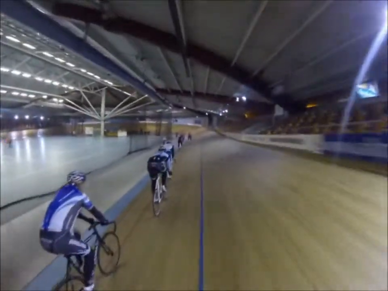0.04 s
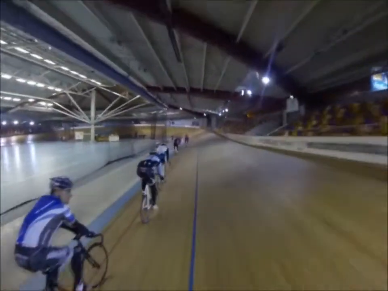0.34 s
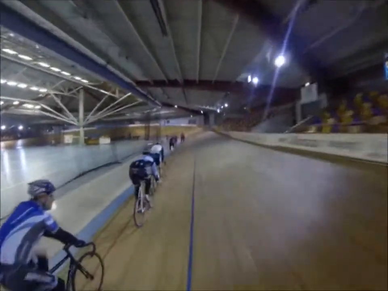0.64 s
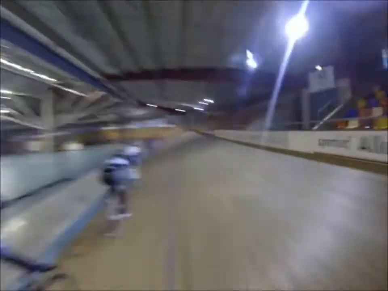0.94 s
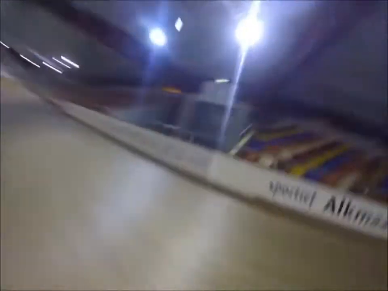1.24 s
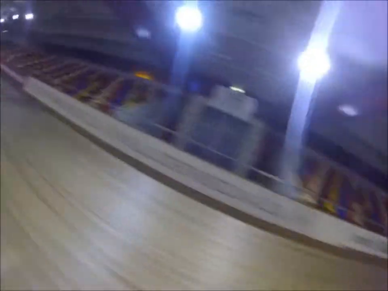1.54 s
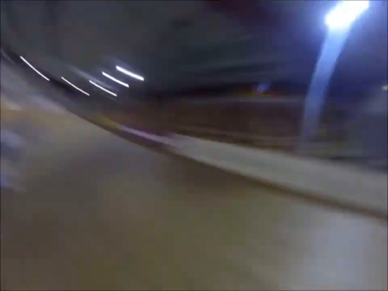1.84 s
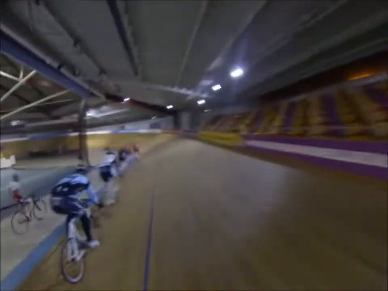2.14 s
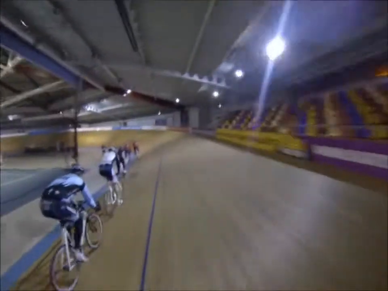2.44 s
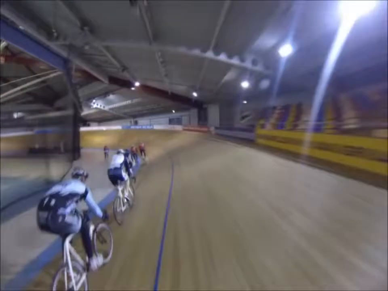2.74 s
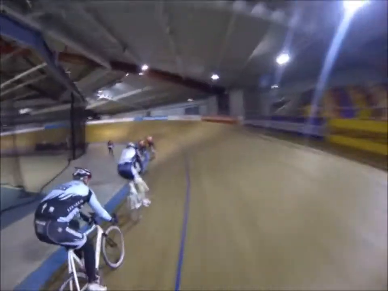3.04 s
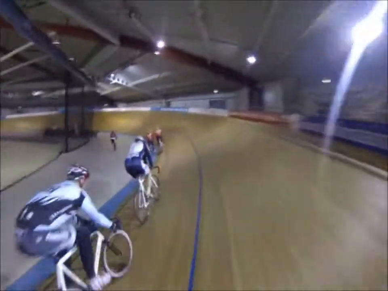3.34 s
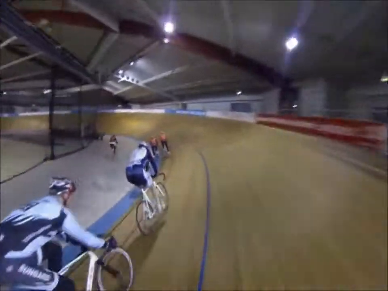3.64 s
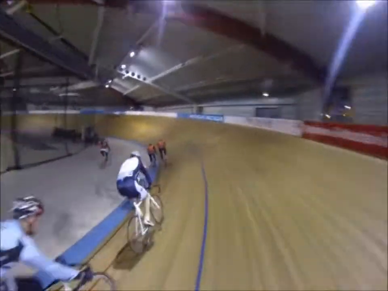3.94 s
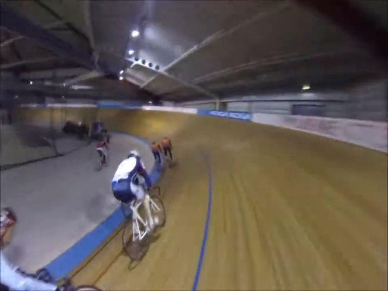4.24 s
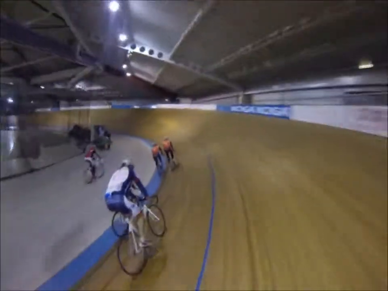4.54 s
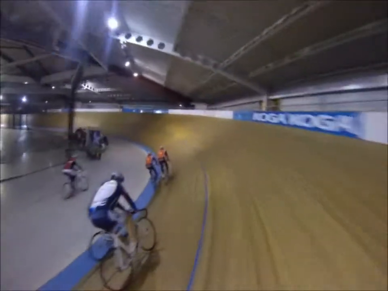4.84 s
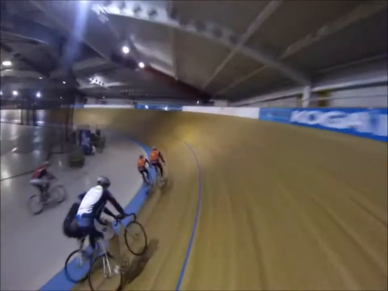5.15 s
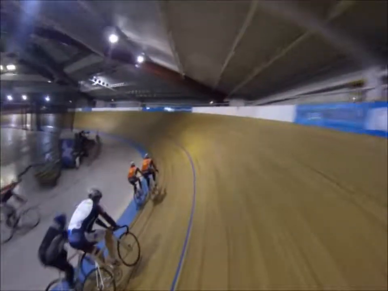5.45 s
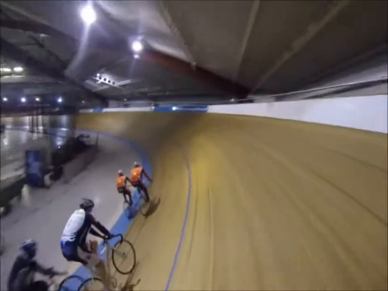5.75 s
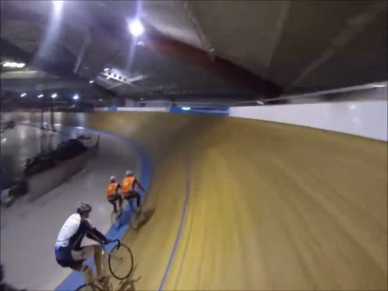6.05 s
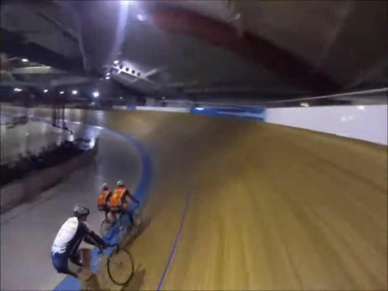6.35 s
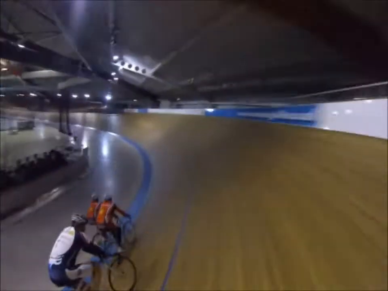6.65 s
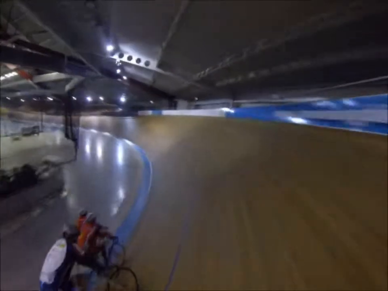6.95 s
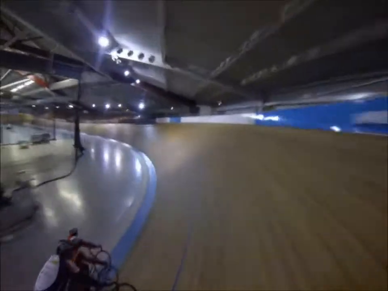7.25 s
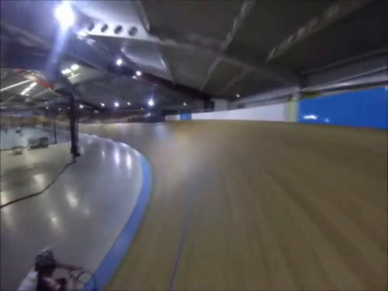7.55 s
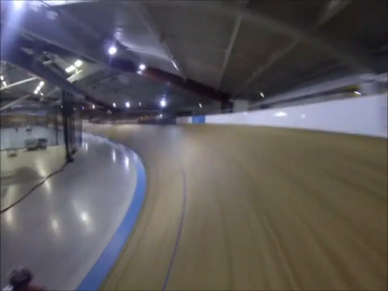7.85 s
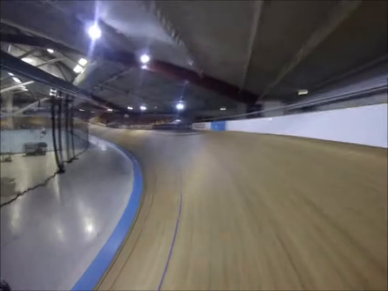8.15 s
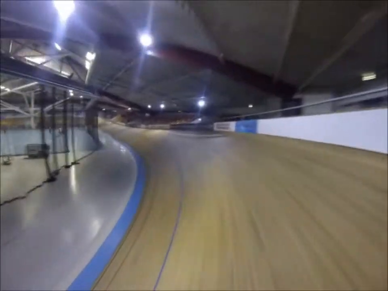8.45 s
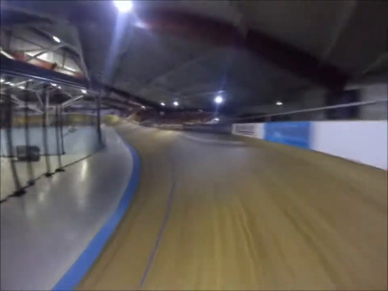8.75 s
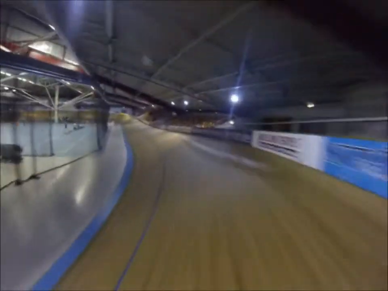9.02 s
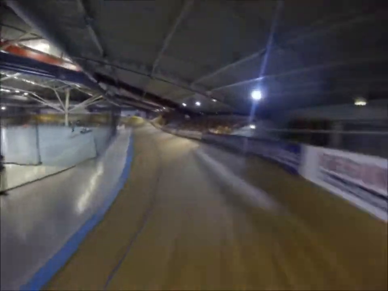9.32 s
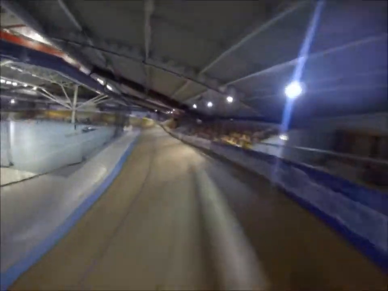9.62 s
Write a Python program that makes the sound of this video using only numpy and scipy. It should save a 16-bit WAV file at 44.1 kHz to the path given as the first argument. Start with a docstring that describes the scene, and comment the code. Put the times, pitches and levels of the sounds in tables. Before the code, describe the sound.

Bicycle tyres roar and lightly hiss on the boards of an indoor track, under the low rumble of wind hitting a microphone that rides along. Early on the air swells into a brief fluttering rush, then settles back to irregular thumps and short gusts with faint crackles. The bicycle chirps thinly for an instant, and later makes a single close, sharp tick and slight rattle as the rolling continues.

```python
"""Cycling round a wooden indoor track

Heard from a camera riding on the bicycle. Tyres roar on the boards below and the head wind rumbles on the
microphone, which crackles faintly on wind peaks; every strong eddy makes the gain control duck the whole
sound. When the rider turns to look sideways the air rushes straight over the port. Close by, the bicycle
gives one sharp tick with a small rattle, and a few thin chirps."""
import sys
import numpy as np
from scipy import signal
from scipy.fft import rfft, irfft, next_fast_len
from scipy.io import wavfile
from scipy.ndimage import map_coordinates

SR = 44100
rng = np.random.default_rng(int(sys.argv[2]) if len(sys.argv) > 2 else 0)


def materialize(psi):
    """Save the field psi as 16-bit PCM at rate SR to the path in sys.argv[1].

    A 1-D psi becomes a single channel; in a 2-D psi each row is a channel.
    """
    bounded = np.clip(np.atleast_2d(psi).T, -1, 1)
    quanta = np.round(bounded * 32767).astype(np.int16)
    wavfile.write(sys.argv[1], SR, quanta)


N = 431298
TIME = np.arange(N) / SR


def amp(db):
    """Decibels to gain."""
    return 10 ** (np.asarray(db) / 20)


def unit(x):
    """Scale to rms 1."""
    return x / np.sqrt(np.mean(x ** 2) + 1e-20)


def curves(rows):
    """One value per sample for each column after the time."""
    times, *columns = np.transpose(rows)
    return [np.interp(TIME, times, column) for column in columns]


def wobble(rate):
    """A smooth random curve, rate knots a second."""
    knots = rng.standard_normal(int(N * rate / SR) + 4)
    return map_coordinates(knots, [TIME * rate], mode="nearest")


def swell(s, width_s):
    """A bell-shaped rise and fall around time s."""
    bell = np.zeros(N)
    near = slice(*np.searchsorted(TIME, [s - 10 * width_s, s + 10 * width_s]))
    bell[near] = np.exp(-.5 * ((TIME[near] - s) / width_s) ** 2)
    return bell


def lagged(x, seconds):
    """One-pole smoothing."""
    keep = np.exp(-1 / (seconds * SR))
    return signal.lfilter([1 - keep], [1, -keep], x)


def filtered(x, response):
    """Filter x by a gain given as a function of frequency."""
    size = next_fast_len(N + SR // 2)
    return irfft(rfft(x, size) * response(np.fft.rfftfreq(size, 1 / SR)), size)[:N]


def noise(spectrum, resonances=()):
    """Noise of rms 1 with a smooth spectrum and resonant humps on it."""
    knots_hz, knots_db = np.transpose(spectrum)

    def response(hz):
        slope_db = np.interp(np.log(hz + 1), np.log(knots_hz), knots_db)
        humps_db = sum(db * np.exp(-.5 * ((hz - centre) / width) ** 2) for centre, width, db in resonances)
        return amp(slope_db + humps_db)
    return unit(filtered(rng.standard_normal(N), response))


def tilted(x, tilt_db, pivot_hz=300):
    """Tip the spectrum of x between 150 and 2500 Hz by tilt_db per octave, one value per sample."""
    hz, times, frames = signal.stft(x, SR, nperseg=512)
    octaves = np.log2(np.clip(hz, 150, 2500) / pivot_hz)
    gain = amp(octaves[:, None] * np.interp(times, TIME, tilt_db))
    return signal.istft(frames * gain, SR, nperseg=512)[1][:N]


# Tyres on the boards below the camera, roar and hiss: (frequency [Hz], spectral level [dB])
ROAR = [(80, -14.5), (200, 6), (400, 1), (620, -1.5), (880, -3.5), (1330, -13.5), (2050, -13.5),
        (2700, -21.5), (3400, -27), (4300, -35), (7000, -74)]
HISS = [(1500, -8.5), (3200, 6), (4400, 0), (5500, -8), (6400, -9), (7200, -17), (9700, -15.5),
        (11000, -16), (12200, -23.5), (14000, -29), (15200, -37)]
# Two hollow notes of the wheels on the boards: (frequency [Hz], spectral level [dB])
HIGH_HOLLOW = [(900, -120), (1450, -33), (1660, -7), (1750, 0.5), (1850, -1.5), (1990, -6.5), (2300, -34),
               (3500, -120)]
LOW_HOLLOW = [(850, -120), (1000, -20.5), (1085, 0), (1135, -2.5), (1220, -15.5), (1450, -120)]
# Resonances of the housing round the microphone: (frequency [Hz], width [Hz], gain [dB])
HOUSING = [(1012, 20, -1), (1096, 60, 0.5), (1275, 87, -1), (1630, 113, 3), (2680, 130, -1),
           (2950, 92, 2.5), (4300, 280, -6), (5060, 330, 6), (8590, 440, 8.5)]
# Rolling noise of the tyres, swelling and easing along the track: (time [s], level [dB])
ROLLING_LEVEL = [(0, -26), (.25, -25), (.36, -26.5), (.53, -27.5), (.63, -27), (.78, -27), (.95, -27.5),
                 (1.85, -27.5), (2.3, -28), (2.6, -27), (2.9, -26.5), (3.08, -26), (3.21, -24),
                 (3.3, -27.5), (3.5, -29.5), (3.63, -27), (3.74, -28.5), (3.97, -25.5), (4.15, -29),
                 (4.4, -30), (4.62, -24), (4.8, -28.5), (5.05, -28.5), (5.22, -25), (5.35, -30.5),
                 (5.66, -26.5), (5.95, -29.5), (6.42, -26.5), (6.7, -27), (6.87, -24.5), (7.0, -25),
                 (7.17, -26), (7.6, -28.5), (7.95, -28), (8.1, -26), (8.25, -28), (8.5, -26.5),
                 (9.03, -28.5), (9.13, -26.5), (9.25, -28.5), (9.42, -29), (9.77, -26.5)]
# The hiss against the roar: (time [s], level [dB])
HISS_LEVEL = [(0, -24), (.8, -25.5), (1.3, -26), (2.0, -26), (2.7, -26), (3.15, -23.5), (3.45, -26.5),
              (4.6, -27.5), (5.5, -25), (6.1, -25.5), (6.9, -25.5), (7.9, -24.5), (8.7, -25.5),
              (9.77, -24.5)]
# The hollow notes against the roar: (time [s], high note level [dB], low note level [dB])
HOLLOW_LEVEL = [(0, -15.3, -18), (1.9, -18, -21.5), (2.8, -18.5, -28), (3.2, -15, -18), (4.2, -18.5, -18),
                (4.65, -16.5, -14), (5.3, -15.5, -15.5), (6.1, -15.5, -22), (7.0, -16.5, -15.5),
                (8.6, -17.5, -17.5), (9.77, -17, -18)]


def tyres(boards_db=0.65, grain_db=0.74, trim_db=0.23, sing_db=2.0):
    """Roar and hiss come through the housing, two notes come and go, and uneven boards shake them all."""
    level_db, = curves(ROLLING_LEVEL)
    hiss_db, = curves(HISS_LEVEL)
    high_db, low_db = curves(HOLLOW_LEVEL)
    shake_db = boards_db * wobble(35) + grain_db * wobble(220)
    rolling = noise(ROAR, HOUSING) + amp(hiss_db) * noise(HISS, HOUSING)
    high_note = amp(high_db + sing_db * wobble(14)) * noise(HIGH_HOLLOW)
    low_note = amp(low_db + sing_db * wobble(14)) * noise(LOW_HOLLOW)
    return amp(level_db + trim_db + shake_db) * (rolling + high_note + low_note)


# Thin chirps of the drive train, close but faint: (time [s], pitch [Hz], level [dB], width [s])
CHIRPS = [(0.61, 11970, -68, .012), (.645, 11850, -71, .012), (.752, 12000, -66, .012),
          (2.9515, 8450, -45, 0.0011), (2.964, 8800, -47, .0012), (2.978, 8800, -37, 0.0006),
          (2.986, 8350, -52, .003)]
# Light rubbing during and after the last chirps: (time [s], level [dB])
RUB_LEVEL = [(2.9, -100), (2.96, -63), (3.08, -62), (3.22, -73), (3.3, -100)]
# Its metallic colour: (frequency [Hz], spectral level [dB])
RUB_COLOUR = [(3000, -31), (5000, 3.5), (7300, -11), (8600, 6), (9600, -4), (12000, -11.5), (15000, -20)]


def chirps(waver_rad=1.3):
    """Metal rubs on metal: brief, unsteady high notes and a fine hiss."""
    drift = waver_rad * wobble(550)
    notes = sum(amp(db) * swell(s, width_s) * np.sin(2 * np.pi * hz * TIME + drift)
                for s, hz, db, width_s in CHIRPS)
    rub_db, = curves(RUB_LEVEL)
    return notes + amp(rub_db) * noise(RUB_COLOUR)


# One sharp, close bicycle tick with a small rattle, plus faint dry crackles of the microphone on
# wind peaks: (time [s], level [dB], pitch factor [ratio])
CLICKS = [(.903, -39, 2.9), (0.981, -30, 3.1), (1.3428, -22, 1.8), (3.641, -23.5, 2.4), (5.8286, -8, 1.01),
          (5.901, -26, 0.74), (5.9115, -27, 1.4), (9.445, -32, 2.7), (9.532, -28, 2.4), (9.568, -34, 1.16)]
# Modes of a click at pitch factor 1: (frequency [Hz], level [dB], time to fall 60 dB [s])
CLICK_MODES = [(814, -1, 0.011), (1560, -2.5, 0.011), (1790, 5, 0.0093), (2330, -6, 0.018),
               (3320, -12, 0.008), (5350, -20.5, 0.008)]


def tick_and_crackles(attack_s=0.00043):
    """Each click rings a few strongly damped modes; the higher its pitch, the sooner it dies."""
    out = np.zeros(N)
    t = np.arange(SR // 20) / SR
    onset = (1 - np.exp(-t / attack_s)) ** 2
    for s, level_db, pitch in CLICKS:
        ring = sum(amp(db - 60 * pitch * t / t60) * np.sin(2 * np.pi * hz * pitch * t)
                   for hz, db, t60 in CLICK_MODES)
        out[round(s * SR):][:len(t)] += amp(level_db) * ring * onset
    return out


# Head wind right on the microphone, strongest as the rider looks sideways: (time [s], level [dB])
WIND_LEVEL = [(0, -12), (.7, -13.5), (1.0, -6.5), (1.3, -3), (1.7, -9.5), (1.9, -13.5), (2.6, -12),
              (4.2, -14), (5.4, -13.5), (7, -13), (8.5, -13), (9.77, -13)]
# Its rumble: (frequency [Hz], spectral level [dB])
RUMBLE = [(8, 2.5), (20, -4.5), (33, 3), (60, -1.5), (110, -7), (200, -13.5), (320, -21.5), (600, -35.5),
          (1500, -66), (5000, -91)]


def head_wind(crest=3, cutoff_hz=1200, trim_db=-3.5):
    """Steady turbulence on the microphone; its swings are bounded."""
    level_db, = curves(WIND_LEVEL)
    bounded = np.tanh(noise(RUMBLE) / crest)
    swirl = filtered(bounded, lambda hz: 1 / (1 + (hz / cutoff_hz) ** 4))
    return amp(level_db + trim_db) * unit(swirl)


# Brief, weaker gusts brushing the microphone: (time [s], level [dB], width [s])
GUSTS = [(0.155, -18, 0.041), (0.363, -16, 0.052), (0.534, -21, 0.0155), (0.643, -17, 0.034),
         (0.772, -17, 0.035), (1.862, -23.5, 0.044), (2.135, -21.5, 0.077), (3.07, -20.5, 0.059),
         (3.203, -21, 0.037), (3.41, -22.5, 0.047), (3.627, -21.5, .026), (4.317, -19.5, 0.047),
         (4.663, -15, 0.047), (5.2, -25, 0.041), (5.696, -18, 0.019), (6.32, -24.5, 0.034),
         (6.825, -21.5, 0.06), (7.506, -21.5, 0.042), (7.876, -18, 0.0083), (8.06, -26, 0.053),
         (8.49, -23, 0.049), (8.785, -20, 0.019), (9.132, -27.5, 0.03), (9.43, -21.5, 0.035)]
# Their colour: (frequency [Hz], spectral level [dB])
GUST_COLOUR = [(40, -18.5), (100, 8.5), (170, 7), (300, -1), (550, -14.5), (900, -12.5), (1300, -23),
               (1800, -20), (2700, -31), (5000, -47), (12000, -77)]


def gusts(crest=8.5):
    """Short gusts swell and fade with a hollow, low roar."""
    flow = sum(amp(db) * swell(s, width_s) for s, db, width_s in GUSTS)
    return flow * unit(np.tanh(noise(GUST_COLOUR) / crest))


# Air across the microphone port as the rider looks sideways, brighter the more squarely it crosses:
# (time [s], level [dB], tilt [dB per octave])
CROSSWIND = [(0.8, -100, -4), (0.88, -19, -7), (0.925, -22, -8), (0.99, -8, -3.5), (1.06, -12.5, -1),
             (1.15, -12, 0.3), (1.25, -10, 0.4), (1.42, -10.5, 0), (1.5, -14.5, -0.5), (1.595, -14.5, 1.5),
             (1.625, -11.5, -4), (1.67, -15, -0.5), (1.74, -31, -4), (1.85, -100, -2)]
# Rush and fizz of that air at the port: (frequency [Hz], spectral level [dB])
RUSH = [(60, -13), (130, 5.5), (260, 7), (400, 1), (550, 2), (850, -2), (1250, -12), (1830, -12),
        (2500, -26.5), (4000, -41), (8000, -84), (14000, -86)]
FIZZ = [(2000, -2), (3200, 4), (4400, 1), (5200, -3), (7300, -12), (8600, 3), (9800, -10), (14000, -32)]


def crosswind(flutter_db=0.5, crest=3.7, fizz_db=-47.0):
    """Air that crosses the port starts as a low buffet, opens into a roar, fizzes and flutters."""
    level_db, tilt_db = curves(CROSSWIND)
    rush = unit(np.tanh(noise(RUSH) / crest))
    fizz = amp(fizz_db) * noise(FIZZ)
    return amp(level_db + flutter_db * wobble(45.2)) * tilted(rush + fizz, tilt_db)


def shed_eddies(busy_s, per_s=6.8, jitter=.4, strength=0.41, spread_db=0.5, push_share=0.59, clear_s=.075):
    """Rows (time, signed pressure) of small eddies, shed at a loose rate clear of the times busy_s."""
    count = 120
    late, weakness, side = rng.uniform(-1, 1, (count, 3)).T
    times = (np.arange(count) + .5 + jitter * late) / per_s
    sign = np.where(np.abs(side) < push_share, 1, -1)  # push or suck
    pressure = strength * amp(-spread_db * weakness) * sign
    gap_s = np.abs(times[:, None] - busy_s).min(axis=1)
    free = (gap_s > clear_s) & (times < N / SR)
    return list(zip(times[free], pressure[free]))


# Big eddies thumping straight on the microphone: (time [s], signed peak pressure [relative])
BIG_EDDIES = [(.154, 0.46), (.232, -0.72), (.384, -0.35), (.521, 0.45), (.652, -0.52), (0.756, -0.47),
              (0.84, -0.58), (0.943, -0.88), (.981, -1.1), (1.345, -1.12), (1.451, 0.94), (1.647, 1.47),
              (2.039, -0.36), (2.328, 0.46), (2.602, 0.5), (2.895, -.4), (3.233, 0.78), (3.4, -0.35),
              (3.465, -0.42), (3.641, -0.58), (3.751, 0.59), (4.03, -0.45), (4.109, 0.52), (4.415, 0.55),
              (4.744, -0.53), (4.894, -0.37), (4.965, 0.43), (5.245, -0.76), (5.417, 0.43), (5.722, 0.59),
              (5.911, 0.39), (6.073, 0.55), (6.178, 0.46), (6.302, -0.36), (6.45, 0.59), (6.559, 0.54),
              (6.919, 0.63), (7.422, 0.51), (7.555, 0.42), (7.662, 0.39), (7.777, 0.37), (8.113, -0.92),
              (8.26, 0.42), (8.435, 0.68), (8.588, 0.63), (8.802, -0.57), (8.902, .5), (9.149, 1.07),
              (9.446, -0.58), (9.535, -0.88), (9.636, -0.72)]


def eddies(width_s=0.0023, scatter=0.29, strength_db=1.7, clearing_s=.007, wake=0.39, wake_s=0.018,
           lull_depth=0.3, lull_lead_s=0.045, lull_s=0.011):
    """Each eddy is a pressure pulse in a shallow opposite swing. Returns thumps and a head wind gain."""
    thumps, wind_gain = np.zeros(N), np.ones(N)
    steps = np.arange(-SR // 20, SR // 3)
    t = steps / SR
    busy_s = np.array([row[0] for row in BIG_EDDIES + GUSTS])
    for (s, pressure), chance in zip(BIG_EDDIES + shed_eddies(busy_s), rng.standard_normal(200)):
        at = np.clip(round(s * SR) + steps, 0, N - 1)
        widths = t / (width_s * np.exp(scatter * chance))
        pulse = np.exp(-.5 * widths ** 2)
        backswing = 0.23 * np.exp(-.5 * ((widths - 2.16) / 6.3) ** 2)
        shape = pulse - backswing
        thumps[at] += pressure * shape / shape.max()
        # the eddy pushes the steady turbulence aside, then stirs it up in its wake
        wind_gain[at] *= 1 - np.exp(-.5 * (t / clearing_s) ** 2)
        wind_gain[at] *= 1 + wake * min(abs(pressure), 1) * (t > 0) * np.exp(-np.abs(t) / wake_s)
    # the air stills just before a big eddy
    lull = sum(lull_depth * min(pressure ** 2, 1) * swell(s - lull_lead_s, lull_s)
               for s, pressure in BIG_EDDIES)
    return amp(strength_db) * thumps, wind_gain * np.clip(1 - lull, 0, 1)


def scene():
    """Wind, tyres, small bicycle sounds and dry crackles at the camera's one microphone."""
    thumps, wind_gain = eddies()
    air = wind_gain * head_wind() + thumps + crosswind() + gusts()
    return (air + tyres() + tick_and_crackles() + chirps())[None]


# Faint crackle of a fast gain change inside the camera: (frequency [Hz], spectral level [dB])
CRACKLE = [(2000, -7.5), (4500, 2), (6500, -4.5), (8500, -9.5), (11000, -15), (15000, -30)]


def gain_control(x, threshold=0.37, sense_s=.0007, attack_s=.0013, release_db_per_s=70,
                 crackle_db=-47, crackle_db_per_s=450):
    """The gain drops fast on a peak and climbs back; a drop on a slow crest of pressure crackles."""
    excess_db = 20 * np.log10(np.maximum(lagged(np.abs(x), sense_s) / threshold, 1))
    release_db = release_db_per_s * TIME
    held_db = np.maximum.accumulate(excess_db + release_db) - release_db
    ahead = 30  # samples of look-ahead
    cut_db = np.pad(lagged(held_db, attack_s), (0, ahead), mode="edge")[ahead:]
    dropping = np.tanh(np.maximum(np.gradient(cut_db) * SR, 0) / crackle_db_per_s)
    on_crest = np.tanh((lagged(x, seconds=.002) / .3) ** 2)
    crackle = amp(crackle_db) * dropping * on_crest * noise(CRACKLE)
    return (x + crackle) * amp(-cut_db)


def record(dry):
    """The camera rides its gain, rounds off the peaks that slip through and cuts the highest treble."""
    ceiling, hardness, top_hz = .8, 6, 15300
    ridden = gain_control(dry[0])
    rounded = ridden / (1 + np.abs(ridden / ceiling) ** hardness) ** (1 / hardness)
    band_limit = signal.ellip(10, .05, 60, top_hz, fs=SR, output="sos")
    fade = np.minimum(np.minimum(TIME, TIME[::-1]) / .002, 1)
    return signal.sosfiltfilt(band_limit, rounded * fade)[None]


dry = scene()
out = record(dry)
materialize(out)
```